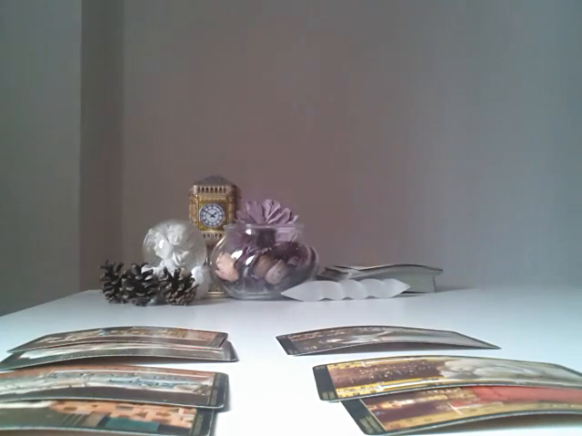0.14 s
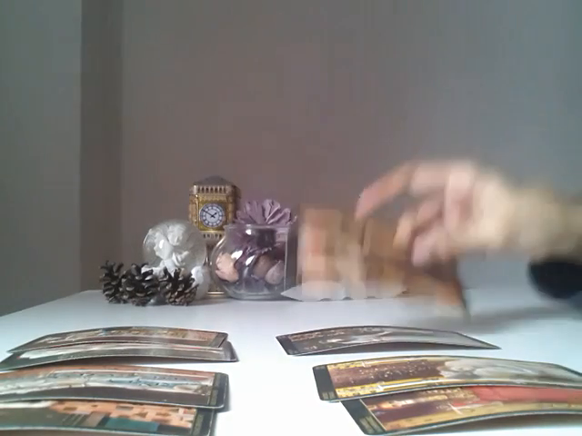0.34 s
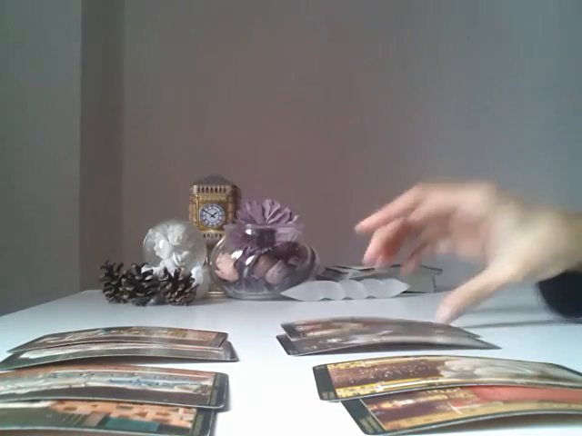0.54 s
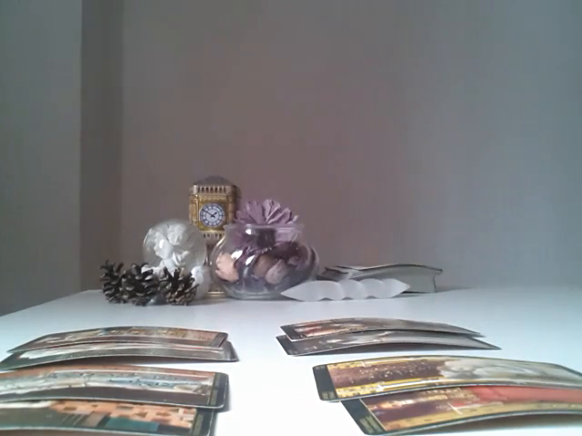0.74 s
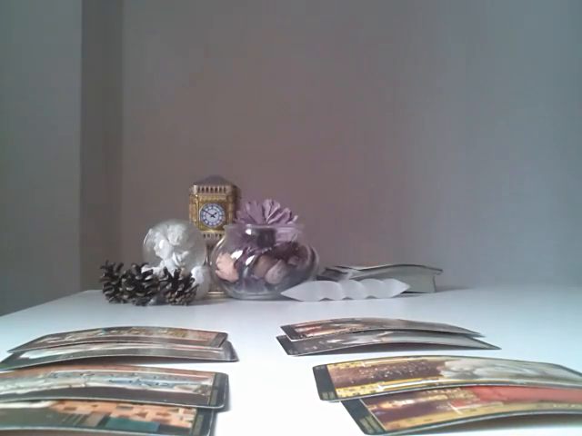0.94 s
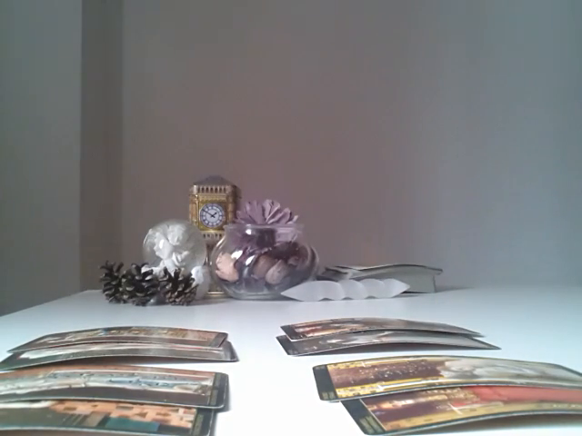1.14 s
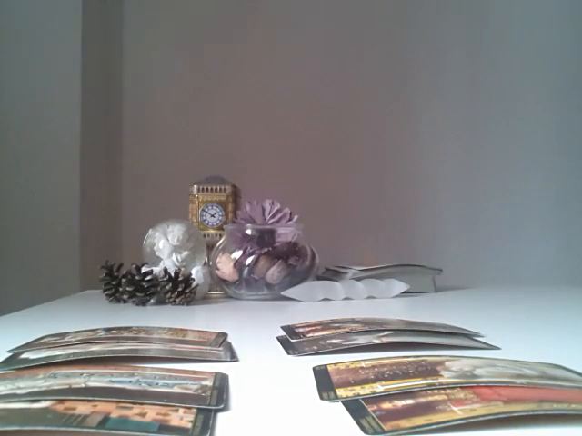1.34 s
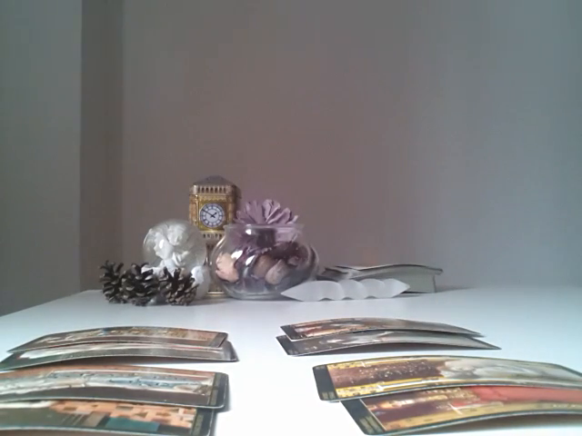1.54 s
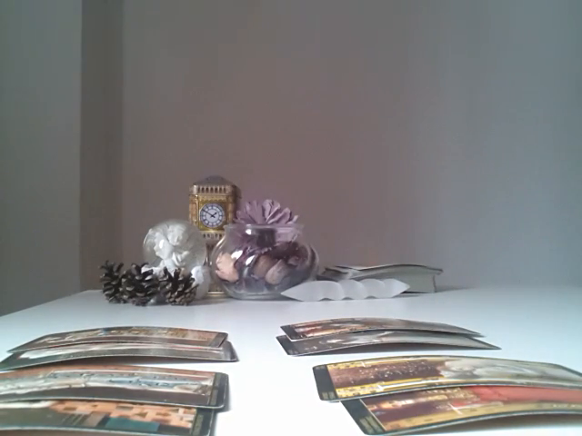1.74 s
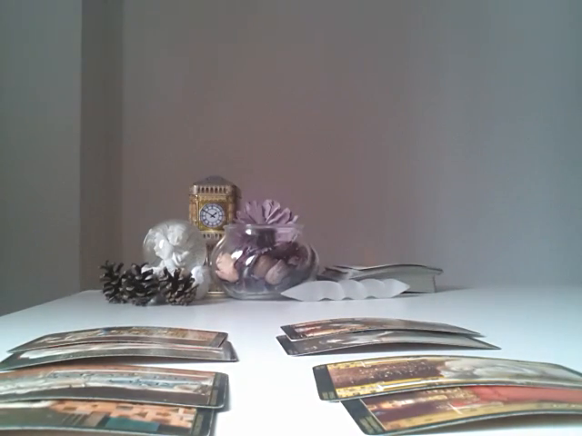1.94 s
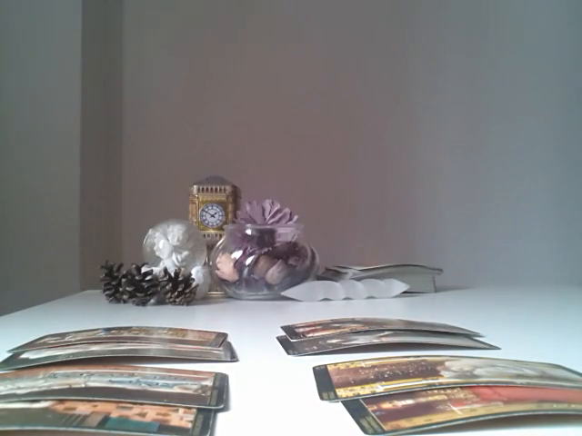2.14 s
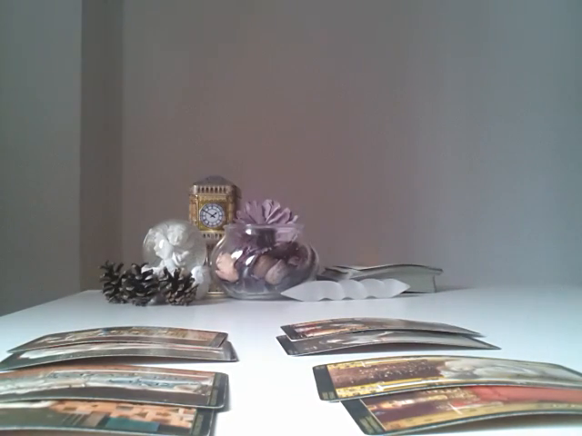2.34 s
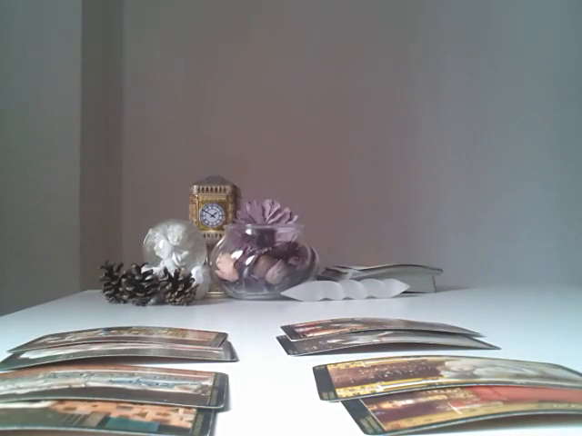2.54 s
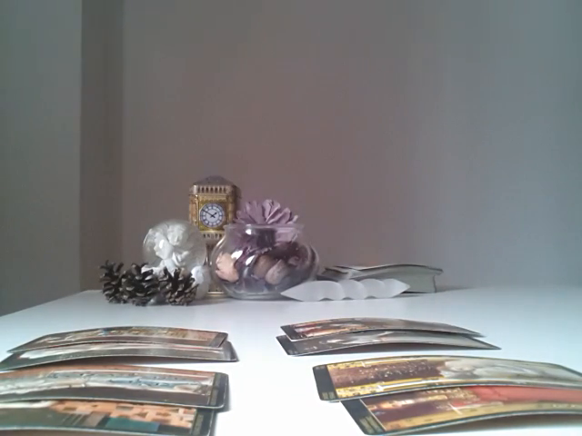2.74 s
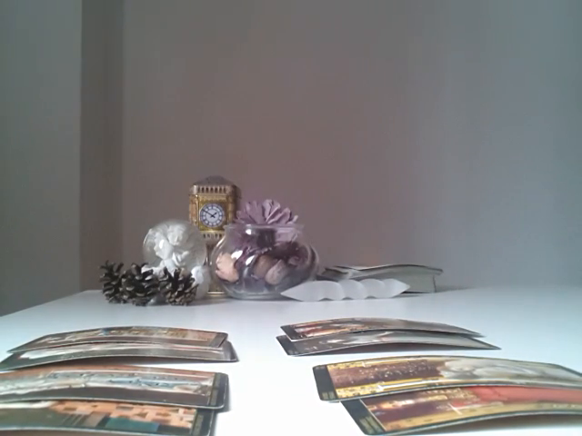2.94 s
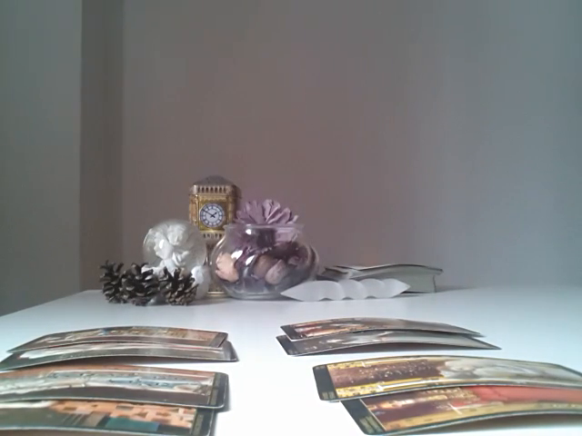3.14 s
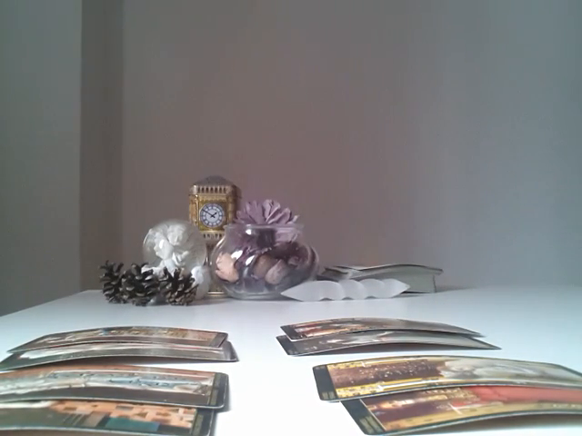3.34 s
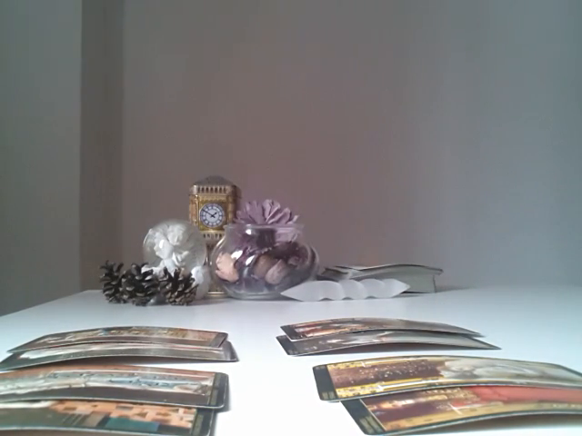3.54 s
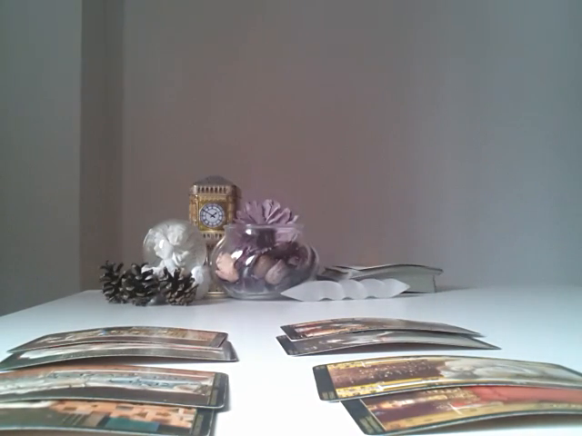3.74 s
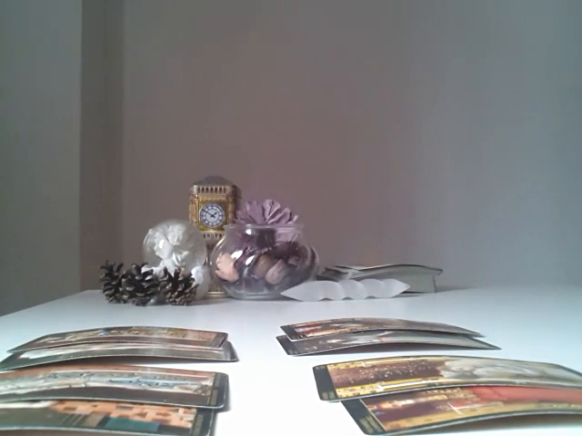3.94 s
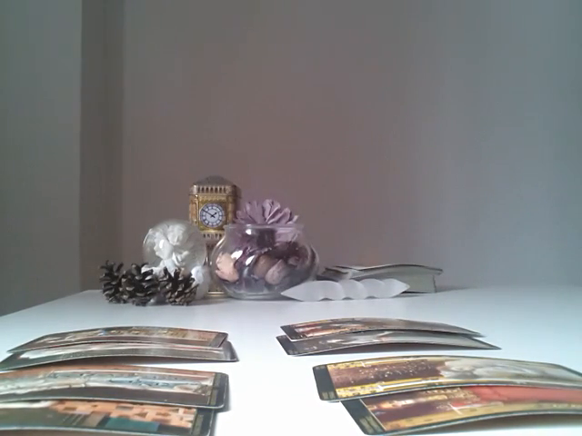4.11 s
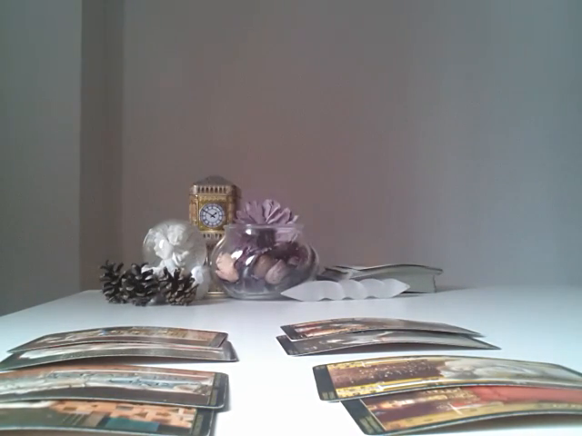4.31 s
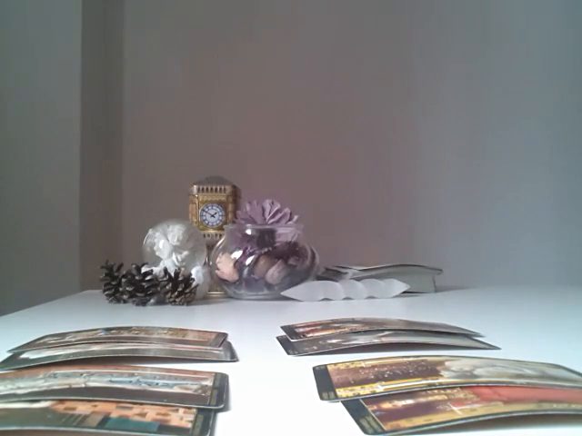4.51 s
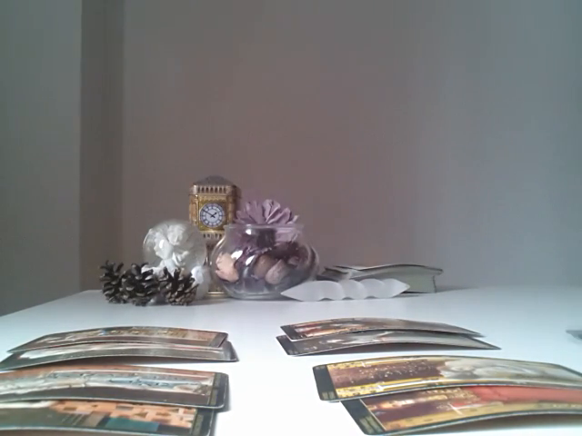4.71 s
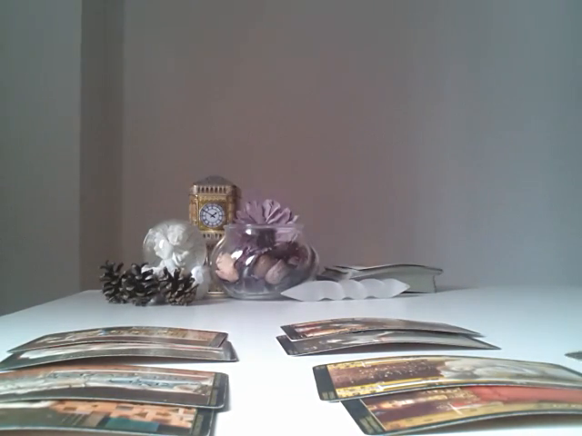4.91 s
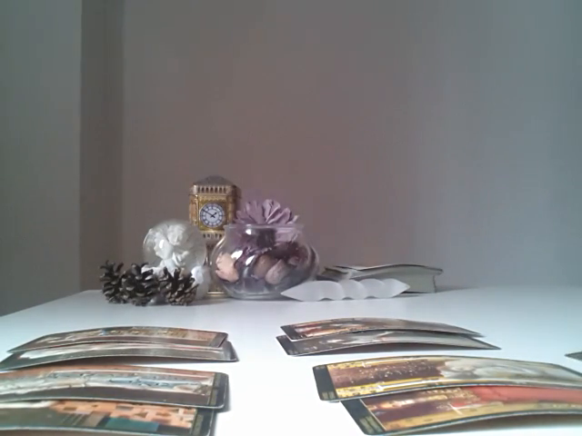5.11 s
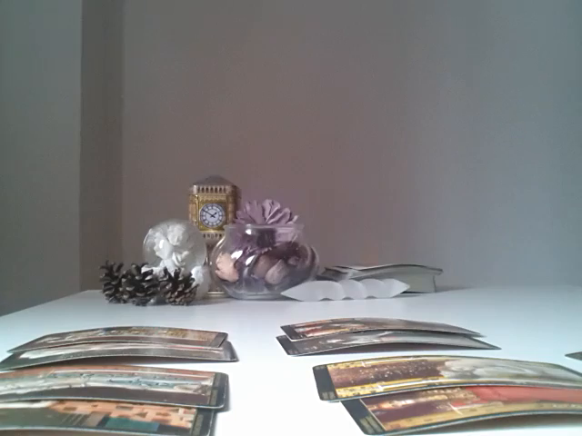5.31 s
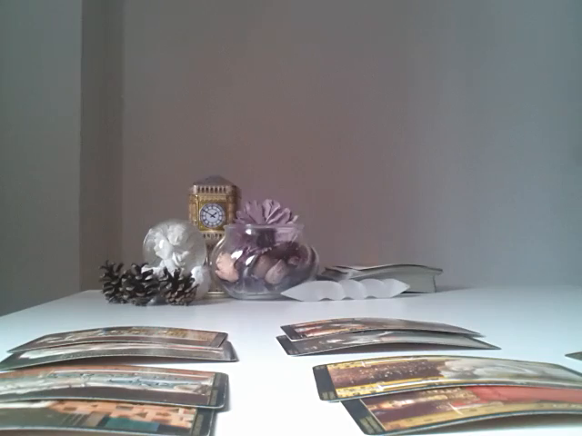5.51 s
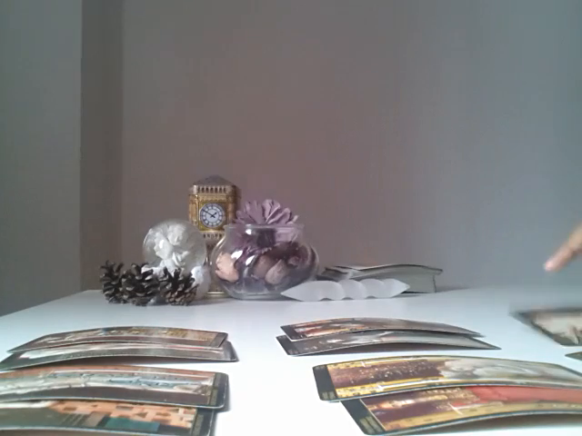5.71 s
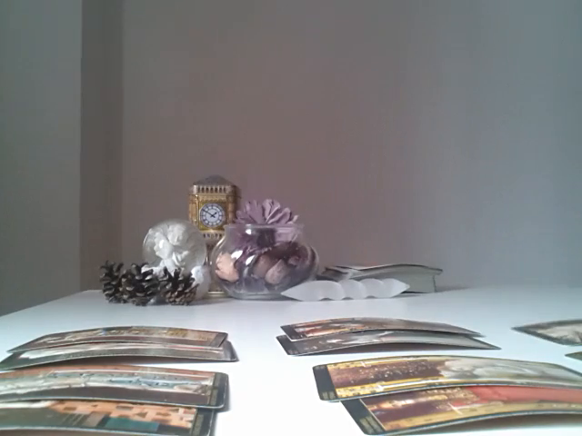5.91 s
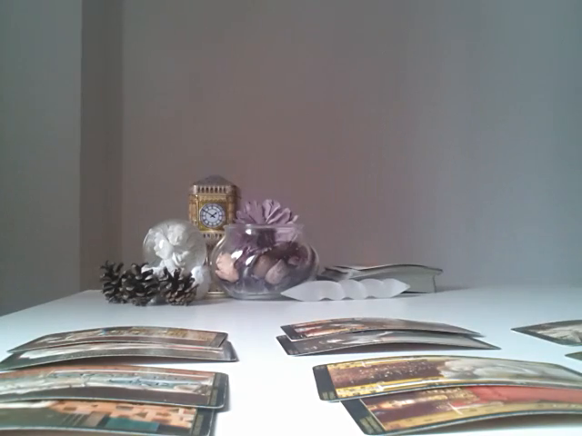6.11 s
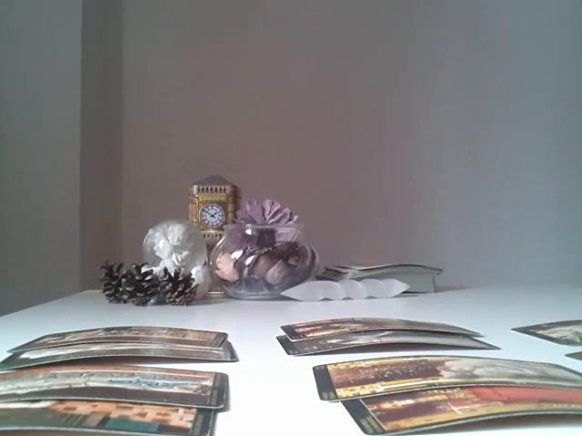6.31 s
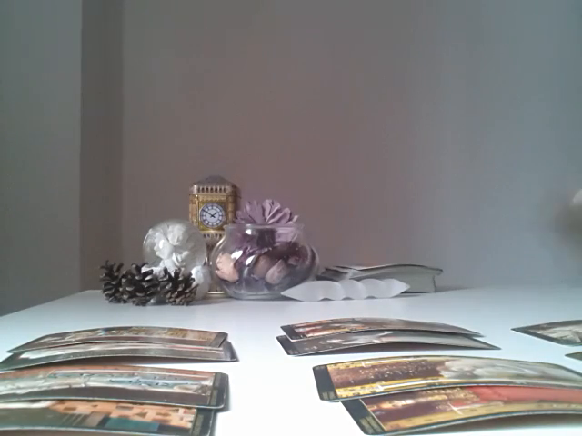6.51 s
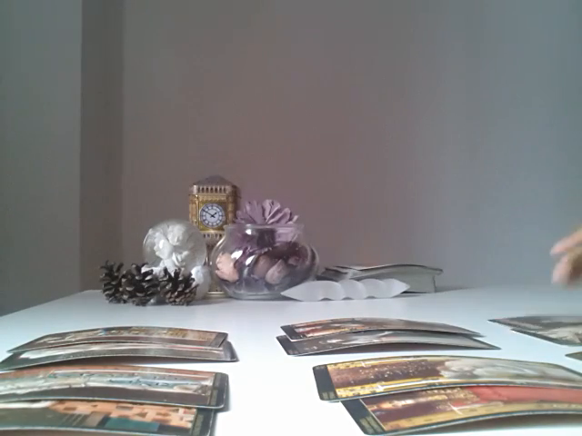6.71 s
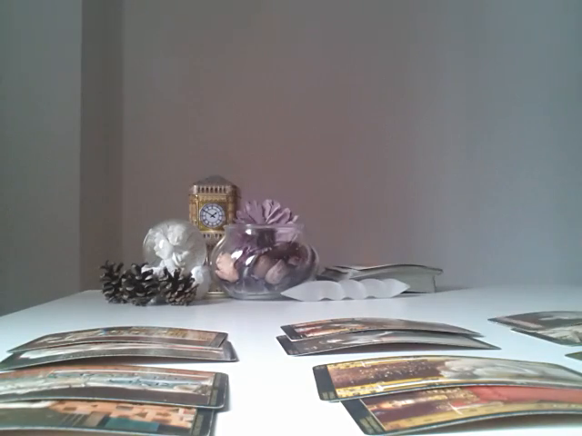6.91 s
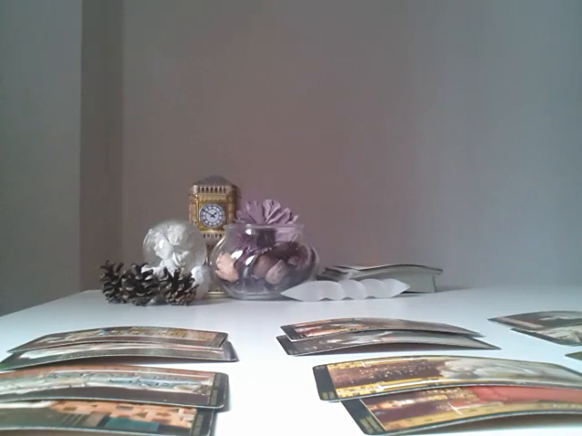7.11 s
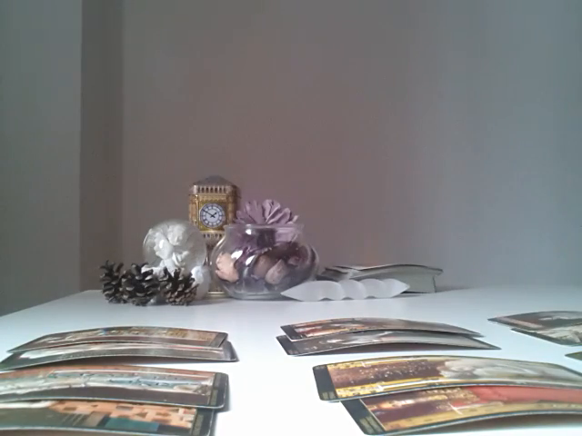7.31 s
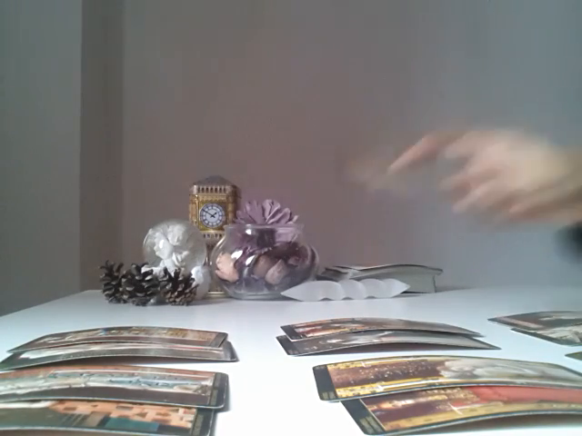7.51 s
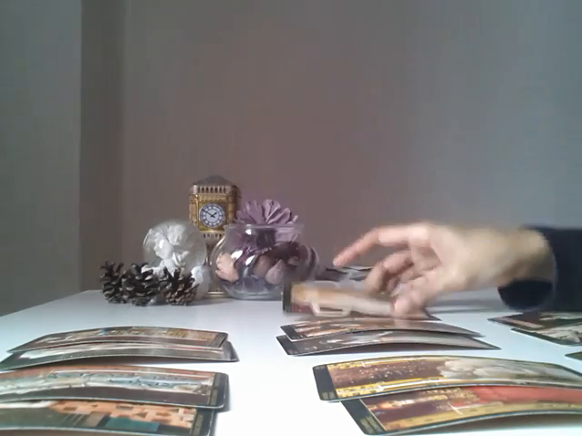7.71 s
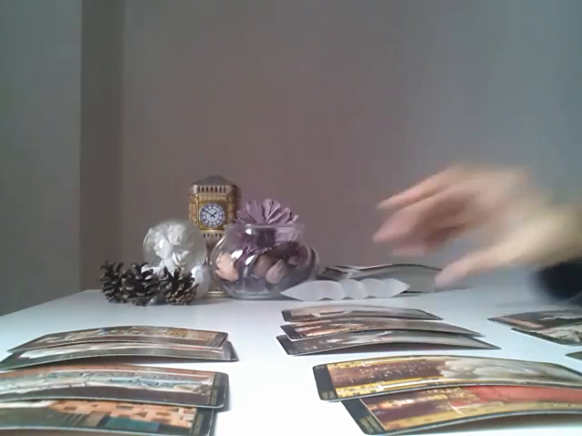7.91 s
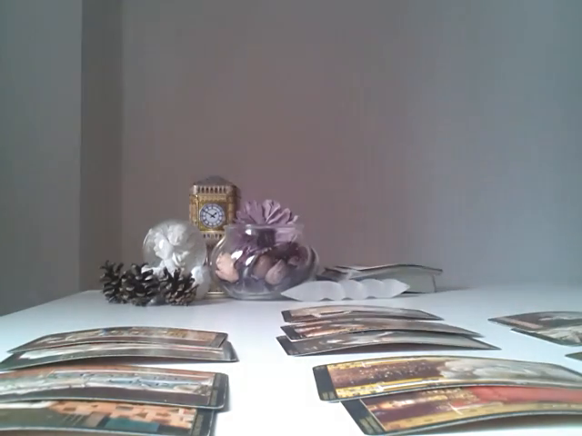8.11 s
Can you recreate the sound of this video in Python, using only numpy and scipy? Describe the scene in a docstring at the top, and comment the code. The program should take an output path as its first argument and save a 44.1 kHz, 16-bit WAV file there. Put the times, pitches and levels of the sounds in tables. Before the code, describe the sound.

Steady but irregular card dealing in a small, quiet room. Thumb rubs make short scratchy slides and quick swishes; card edges crack free with sharp clicks, some with a woody tap from the tabletop. Brief squeaky chirps accompany some flicks. The loudest snaps come early, near four seconds and at the end. The stereo pickup is close, cards slightly right of centre, over a faint steady hiss.

```python
"""A card hisses as a thumb rubs it off the deck, then its edge cracks free; stiff cards are dealt so, one by one,
onto a table in a small room, close to a stereo camera and to its right.
Rubs are stick-slip noise following the card's speed; snaps are a scattered pulse, coloured as crack and knock.
Squeaks are narrow noise on a climbing pitch, tabletop bumps are decaying cosines;
a faint steady hiss lies beneath."""
import sys
import numpy as np
from scipy import signal
from scipy.fft import rfft, irfft, next_fast_len
from scipy.io import wavfile
from scipy.ndimage import uniform_filter1d

SR = 44100
rng = np.random.default_rng(int(sys.argv[2]) if len(sys.argv) > 2 else 0)


def dump(signal):
    """Clip the signal to [-1, 1] and save it as 16-bit WAV at the path in sys.argv[1]."""
    limited = np.clip(np.atleast_2d(signal).T, -1, 1)
    pcm = np.round(limited * 32767).astype(np.int16)
    wavfile.write(sys.argv[1], SR, pcm)


N = 359415

# cards in hand, in turn: taken_s, right_mic_lead_ms, room_db (before ROOM_TRIM_DB), flex_hz,
# brightness_db_per_octave, knock_hz
CARDS = [(0, .328, -13, 4760, -1.76, 505), (.4, 0.034, -4, 2140, -2.5, 620),
         (.88, 0.35, -10, 4695, 0.4, 340), (1.35, .35, -9.5, 2156, -1.9, 263),
         (1.92, .35, -13, 6060, 0.5, 550), (2.11, 0.36, -7.5, 4730, 0, 315), (2.59, 0.36, -8, 5840, 0, 656),
         (3.12, .286, -8.5, 5700, -1.5, 920), (3.63, 0.097, -5, 4860, -1, 510),
         (4.32, 0.27, -6.5, 3310, 0, 527), (4.59, .17, -4.5, 6100, -2, 550),
         (5.31, 0.24, -6, 2170, -1.5, 453), (5.64, .16, -11, 2320, -2.5, 635),
         (6.25, .27, -5.5, 4090, -4, 452), (6.578, .151, -4, 8320, -1.2, 830),
         (7.11, 0.31, -7, 3300, 1.5, 700), (7.66, .034, -4.5, 3400, -1.5, 563)]
# steady slides over deck or table: start_s, length_s, hiss_db, dull_rub_db (levels at mid-slide)
SLIDES = [(0, 0.075, -45, -71), (.418, 0.21, -46, -57), (1.115, 0.12, -54, -61.5),
          (1.37, 0.089, -53, -65.5), (1.495, .075, -44.5, -56), (1.57, .17, -46.5, -59.5),
          (1.745, .08, -41.5, -55.5), (2.226, 0.04, -51.5, -66.5), (2.335, .13, -46.5, -50.5),
          (2.63, .215, -46.5, -50), (2.9, 0.073, -53.5, -60.5), (3.335, .15, -48, -50.5),
          (3.664, 0.105, -48, -50.5), (3.772, 0.1, -50, -44), (4.365, .13, -50, -56.5),
          (4.617, .25, -50.5, -51), (5.342, .11, -44.5, -51), (5.664, 0.2, -47, -51),
          (5.752, .07, -42.5, -70), (6.31, 0.067, -49, -67), (6.605, .12, -45.5, -47.5),
          (6.72, 0.12, -54, -61), (7.26, 0.13, -56.5, -62), (7.722, 0.062, -44, -42),
          (7.85, .09, -44, -58.5)]
# quick pushes or flicks: fastest_s, rise_s (over 20 dB), hiss_db, dull_rub_db (levels at the peak)
SWISHES = [(.07, 0.048, -43.5, -43.5), (.112, 0.038, -31.5, -39), (.452, 0.017, -37.5, -54),
           (.501, 0.028, -23.5, -28.5), (.918, 0.029, -57, -63.5), (1.183, 0.028, -35, -39.5),
           (1.246, 0.03, -32, -44.5), (1.502, 0.01, -38, -50), (1.818, 0.068, -43.5, -45.5),
           (1.956, 0.0136, -38, -41.5), (2.354, 0.035, -38.5, -43), (2.455, .04, -40, -75),
           (2.648, 0.03, -38.5, -42.5), (2.81, 0.063, -37, -38), (3.16, 0.029, -59, -65),
           (3.261, 0.017, -43, -52.5), (3.362, 0.045, -40.5, -48), (3.473, .04, -33.5, -37.5),
           (3.97, .03, -45.5, -54.5), (4.395, 0.035, -43, -53.5), (4.485, 0.044, -45, -68),
           (4.655, 0.024, -35.5, -40), (4.765, .018, -35.5, -40), (4.785, 0.02, -31, -36.5),
           (5.36, 0.021, -50, -45), (5.443, 0.021, -37, -59), (5.82, 0.01, -32.5, -39),
           (5.932, 0.02, -38, -46.5), (6.337, 0.03, -39, -43.5), (6.403, 0.028, -42, -54.5),
           (6.697, 0.021, -29.5, -31.5), (7.138, 0.0034, -56.5, -66), (7.29, 0.034, -46, -54),
           (7.365, .03, -42.5, -73), (7.763, .04, -36, -50), (7.83, 0.043, -41.5, -40)]
# edges snapping free or hitting the table: time_s, crack_db, knock_db (energy of 1 ms at that level)
SNAPS = [(0.1105, -23.5, -44.5), (0.114, -18, -31), (0.4196, -25, -29), (0.4371, -12, -11),
         (0.4786, -13, -21.5), (0.4961, -20, -16), (0.4987, -19.5, -41.5), (1.1845, -25.5, -33),
         (1.4274, -33, -35.5), (1.4974, -25.5, -44), (1.6375, -30, -45.5), (1.7446, -29.5, -41),
         (1.8191, -23, -44), (1.9503, -24, -43), (1.957, -32, -52), (2.6302, -16, -29), (2.6578, -28, -42),
         (2.8028, -24, -33), (2.8078, -18.5, -33.5), (2.8125, -22.5, -21), (2.8235, -21.5, -26),
         (2.9525, -37, -47), (3.6755, -32, -39), (3.6862, -28, -32), (3.7352, -25, -40),
         (3.765, -23.5, -36), (3.7696, -10.5, -13.5), (4.6255, -23, -33), (4.6523, -26.5, -24),
         (4.7047, -26, -21), (4.7648, -22.5, -24.5), (4.7808, -15.5, -21), (4.785, -19.5, -22),
         (5.6788, -28.5, -30.5), (5.6898, -28, -28.5), (5.8172, -23.5, -21.5), (6.3322, -29.5, -39.5),
         (6.3405, -33, -46), (6.6117, -28, -27.5), (6.6205, -29.5, -31.5), (6.6295, -31, -29),
         (6.679, -25, -26), (6.6858, -17, -16), (7.3655, -37.5, -59), (7.6949, -20.5, -28),
         (7.722, -24.5, -28), (7.8418, -17, -27), (7.8437, -12.5, -18.5), (7.8578, -22.5, -49)]
# edge chatter squeaking, each squeak at its own pitch: loudest_s, pitch_hz (at loudest), level_db
SQUEAKS = [(1.185, 2180, -36.5), (1.819, 3260, -38.5), (2.356, 4740, -34), (2.452, 2640, -46.5),
           (2.812, 2560, -25), (2.818, 3694, -28), (3.361, 3000, -41.5), (3.473, 2684, -34),
           (5.39, 3740, -42.5), (5.442, 2810, -39), (6.336, 2987, -36), (6.695, 5430, -30.5),
           (7.365, 4650, -51)]
# finger or deck bumping the tabletop: time_s, level_db (before the attack), pitch_hz, t60_s
BUMPS = [(1.4277, -30, 270, 0.021), (1.825, -43.5, 237, 0.057), (2.825, -46, 190, .06),
         (3.7696, -32.5, 466.5, 0.29)]
# background spectrum: freq_hz, relative_db_per_hz
FLOOR_SPECTRUM = [(30, -9), (130, -31), (230, -1.5), (400, 1.5), (1500, -3), (14000, -5.5)]
# card-face hiss spectrum: freq_hz, relative_db_per_hz
HISS_SPECTRUM = [(300, -32), (900, -9.5), (1800, -2), (3000, -2), (6000, -2), (10000, -7), (14500, -15.5)]
# dull rub spectrum of deck or table: freq_hz (for a 520 Hz knock), relative_db_per_hz
BODY_SPECTRUM = [(70, -22.5), (140, -30), (240, -9.5), (460, -1), (650, -4), (1100, -3.5), (2000, -7.5),
                 (6000, -48)]
# snapping edge spectrum: freq_hz, relative_db_per_hz
CRACK_SPECTRUM = [(300, -33.5), (1000, -9.5), (2200, -2), (5500, 1.5), (14500, -12)]
# knock spectrum: multiple_of_knock_hz, relative_db
KNOCK_SPECTRUM = [(.15, -34.5), (.5, -13), (1, -2), (1.9, 2), (3.5, -6.5), (10, -62)]
# late room decay: freq_hz, t60_s
ROOM_DECAY = [(500, 0.34), (2000, 0.37), (6000, 0.29), (14000, 0.53)]

STROKE_SAMPLES = 3 * SR // 5
DRAG_SAMPLES = SR // 125
SLIDE_ATTACK_S, SLIDE_RELEASE_S = 0.0075, 0.005  # time constants
SLIDE_SAG_DB_PER_S = 10.5  # friction slows the card
SWISH_FALL_S = 0.037  # over 20 dB
SQUEAK_RISE_S, SQUEAK_FALL_S = 0.017, 0.016  # over 20 dB
SQUEAK_BANDWIDTH_SHARE = 0.17  # of the pitch
SQUEAK_GLIDE_SHARE_PER_S = 2.3  # the free end shortens, so the note climbs
ROOM_TRIM_DB = -2.0
TOP_HZ = 14750


def amp(db):
    """Decibels to gain."""
    return 10 ** (np.asarray(db) / 20)


def unit(x):
    """Scale to rms 1."""
    return x / np.sqrt(np.mean(x ** 2) + 1e-20)


def along(points, hz):
    """(Hz, value) points read on a log-frequency axis."""
    f, v = np.transpose(points)
    return np.interp(np.log(hz + 1), np.log(f + 1), v)


def coloured(x, shape_db, size=2048):
    """Filter x by the causal minimum-phase response of gain shape_db(hz)."""
    cepstrum = irfft(np.log(amp(shape_db(np.fft.rfftfreq(size, 1 / SR)))))
    # fold the cepstrum onto positive time: minimum phase
    cepstrum[1:size // 2] *= 2
    cepstrum[size // 2 + 1:] = 0
    response = irfft(np.exp(rfft(cepstrum)))
    m = next_fast_len(x.shape[-1] + size, True)
    return irfft(rfft(x, m) * rfft(response, m), m)[..., :x.shape[-1]]


def wobble(n, knots_per_s, count=512):
    """Random curve of n samples, linear between normal knots."""
    return np.interp(np.arange(n) * knots_per_s / SR, np.arange(count), rng.standard_normal(count))


def add(track, x, start_s):
    """Mix x into the stereo track at start_s."""
    part = track[:, max(round(start_s * SR), 0):][:, :x.shape[-1]]
    part += x[..., :part.shape[-1]]


def background(level_db=-66.5):
    """Steady faint hiss of microphones and quiet room, partly common to both channels."""
    noise = rng.standard_normal((2, N)) + 0.5 * rng.standard_normal(N)
    return amp(level_db) * unit(coloured(noise, lambda hz: along(FLOOR_SPECTRUM, hz)))


def slide_speed(t, start_s, length_s):
    """Even slide: attack, slowly sagging hold, release."""
    age = np.clip(t - start_s, 0, None)
    starting = 1 - np.exp(-age / SLIDE_ATTACK_S)
    sag = amp(-SLIDE_SAG_DB_PER_S * (age - length_s / 2))
    stopping = np.exp(-np.clip(age - length_s, 0, None) / SLIDE_RELEASE_S)
    return starting * sag * stopping


def swish_speed(t, peak_s, rise_s):
    """Pointed swell: the card gathers speed, then is checked."""
    return 10 ** -np.maximum((peak_s - t) / rise_s, (t - peak_s) / SWISH_FALL_S)


def card_colour(spectrum, flex_hz, bright, flex_db):
    """A bent card favours one broad resonance; a tilt above 1 kHz sets its brightness."""
    def shape_db(hz):
        distance = np.log2((hz + 1) / flex_hz) / .12
        tilt = bright * np.log2(np.clip(hz, 1000, None) / flex_hz)
        return along(spectrum, hz) + tilt + flex_db / (1 + distance ** 2)
    return shape_db


def scatter(t60_s, share_db, soft_hz=7000):
    """A pulse and its quick, duller echoes from nearby surfaces, different at each microphone."""
    t = np.arange(SR // 20) / SR
    echoes = rng.standard_normal((2, len(t))) * amp(-60 * t / t60_s) * (t > 0)
    echoes *= amp(share_db) / np.linalg.norm(echoes, axis=1, keepdims=True)
    return (t == 0) + coloured(echoes, lambda hz: -10 * np.log10(1 + (hz / soft_hz) ** 2))


def shifting(x, depth_db, size=256):
    """The sliding card bends and changes its contacts, so its resonances come and go."""
    z = signal.stft(x, nperseg=size)[2]
    field = rng.standard_normal(z.shape[1:])
    for _ in range(2):
        field = uniform_filter1d(field, size=3, axis=0)  # over frequency
        field = uniform_filter1d(field, size=7, axis=1)  # over time
    return signal.istft(z * amp(depth_db * unit(field)))[1][:, :x.shape[-1]]


def friction(shape_db, slips_per_s, smooth_db, judder_db, judder_per_s, shift_db):
    """Stick and slip: tiny catches of uneven size on a smooth rush, all pressed unevenly."""
    n = STROKE_SAMPLES
    slips = (rng.random(n) < slips_per_s / SR) * rng.standard_normal(n)
    catches = signal.fftconvolve(slips[None], scatter(t60_s=0.0022, share_db=-10.5), axes=1)[:, :n]
    rush = rng.standard_normal(n) + rng.standard_normal((2, n))
    pressure = amp(judder_db * wobble(n, judder_per_s))
    force = (unit(catches) + amp(smooth_db) * unit(rush)) * pressure
    moving = shifting(force, shift_db)
    # close table reflections hollow the scrape
    near = signal.fftconvolve(moving, scatter(t60_s=0.025, share_db=-7), axes=1)[:, :n]
    return unit(coloured(near, shape_db))


def rub(t, slides, swishes, flex_hz, bright, knock_hz):
    """Card face hisses and the deck or table under it murmurs, both with the card's speed."""
    moves = [(slide_speed(t, s, length_s), levels) for s, length_s, *levels in slides]
    moves += [(swish_speed(t, s, rise_s), levels) for s, rise_s, *levels in swishes]
    power = sum(np.outer(amp(levels), speed) ** 2 for speed, levels in moves)
    hiss_gain, body_gain = np.sqrt(power)
    hardness = (knock_hz / 520) ** 0.13  # a harder support murmurs higher
    hiss = friction(card_colour(HISS_SPECTRUM, flex_hz, bright, flex_db=4.5), slips_per_s=710,
                    smooth_db=8.0, judder_db=1.0, judder_per_s=250, shift_db=3.0)
    body = friction(lambda hz: along(BODY_SPECTRUM, hz / hardness), slips_per_s=700,
                    smooth_db=1.5, judder_db=3.5, judder_per_s=90, shift_db=0.16)
    return hiss_gain * hiss + body_gain * body


def dragged(pulse, drag_s=0.00023, drag_db=-3):
    """The edge scrapes for an instant, ever harder, before it lets go."""
    growth = np.exp(np.arange(-DRAG_SAMPLES, 0) / SR / drag_s)
    drag = rng.standard_normal(DRAG_SAMPLES) * growth
    drag *= amp(drag_db) / np.linalg.norm(drag)
    return np.hstack([np.tile(drag, (2, 1)), pulse])


def snap(crack_db, knock_db, flex_hz, bright, knock_hz):
    """An edge lets go: a sharp crack of card and a short knock of what lies beneath."""
    crack = coloured(dragged(scatter(t60_s=0.011, share_db=5.5)),
                     card_colour(CRACK_SPECTRUM, flex_hz, bright, flex_db=0.5))
    knock_points = np.multiply(KNOCK_SPECTRUM, [knock_hz, 1])
    knock = coloured(dragged(scatter(t60_s=0.04, share_db=4.5), drag_db=-5.0),
                     lambda hz: along(knock_points, hz))
    one_ms = np.sqrt(SR / 1000 / crack.shape[-1])  # energy of one millisecond
    return one_ms * (amp(crack_db) * unit(crack) + amp(knock_db) * unit(knock))


def squeak(t, peak_s, hz, level_db):
    """Uneven slips fall in step: a rough, narrow note that swells, climbs and falls away."""
    age = t - peak_s
    lowpass = signal.butter(2, SQUEAK_BANDWIDTH_SHARE * hz / 2, fs=SR, output="sos")
    chatter = signal.sosfilt(lowpass, rng.standard_normal((2, len(t))))
    phase = 2 * np.pi * hz * (age + SQUEAK_GLIDE_SHARE_PER_S * age ** 2 / 2)
    note = unit(chatter[0] * np.cos(phase) + chatter[1] * np.sin(phase))
    swell = 10 ** -np.maximum(-age / SQUEAK_RISE_S, age / SQUEAK_FALL_S)
    return amp(level_db) * note * swell


def placed(x, lead_ms, shade_db_per_ms=17, shade_hz=1300):
    """The nearer microphone hears the card sooner; the camera shades the other from its treble."""
    late = int(round(abs(lead_ms) * SR / 1000))
    far = int(lead_ms < 0)  # 0 = left

    def shade_db(hz):
        return shade_db_per_ms * lead_ms / 2 * hz ** 2 / (hz ** 2 + shade_hz ** 2)
    pair = np.array([coloured(x[0], lambda hz: -shade_db(hz)), coloured(x[1], shade_db)])
    pair[far] = np.pad(pair[far], (late, 0))[:x.shape[-1]]
    return pair


def room(x, build_up_s=0.014, early_db=3, early_t60_s=0.14):
    """Near walls add a quick early decay to a diffuse tail whose decay varies with frequency."""
    hz, t, z = signal.stft(rng.standard_normal((2, SR // 2)), SR, nperseg=256)
    tail = signal.istft(z * amp(-60 * t / along(ROOM_DECAY, hz)[:, None]), SR)[1]
    age = np.arange(tail.shape[-1]) / SR
    early = 1 + amp(early_db - 60 * age / early_t60_s)
    tail = tail * (1 - np.exp(-age / build_up_s)) * early
    return signal.fftconvolve(x, tail / np.linalg.norm(tail[0]), axes=1)


def of_card(table, k):
    """Table rows timed while card k is in hand."""
    taken_s = [card[0] for card in CARDS]
    return [row for row in table if max(np.searchsorted(taken_s, row[0], "right") - 1, 0) == k]


def dealing():
    """Each card's slides, swishes, squeaks and snaps sound from its own place in the room."""
    out = np.zeros((2, N))
    for k, (start_s, lead_ms, room_db, flex_hz, bright, knock_hz) in enumerate(CARDS):
        t = start_s + np.arange(STROKE_SAMPLES) / SR
        card = rub(t, of_card(SLIDES, k), of_card(SWISHES, k), flex_hz, bright, knock_hz)
        for s, crack_db, knock_db in of_card(SNAPS, k):
            edge = snap(crack_db, knock_db, flex_hz, bright, knock_hz)
            add(card, edge, s - DRAG_SAMPLES / SR - start_s)
        squeaks = sum(squeak(t, *row) for row in of_card(SQUEAKS, k))
        add(out, placed(card + squeaks, lead_ms), start_s)
        # squeaks sound drier than the rest
        add(out, amp(room_db + ROOM_TRIM_DB) * room(card + squeaks / 2), start_s)
    return out


def tabletop(attack_s=0.0032):
    """The tabletop answers a bump with a low, woody, decaying note."""
    out, t = np.zeros((2, N)), np.arange(SR // 3) / SR
    for s, level_db, hz, t60_s in BUMPS:
        envelope = amp(level_db - 60 * t / t60_s) * (1 - np.exp(-t / attack_s))
        add(out, envelope * np.cos(2 * np.pi * hz * t), s)
    return out


def scene():
    """Cards and table over the background."""
    return dealing() + tabletop() + background()


def record(dry):
    """Everything above TOP_HZ is cut off sharply."""
    m = next_fast_len(N + SR // 4, True)
    return irfft(rfft(dry, m) * (np.fft.rfftfreq(m, 1 / SR) < TOP_HZ), m)[:, :N]


dry = scene()
out = record(dry)
dump(out)
```